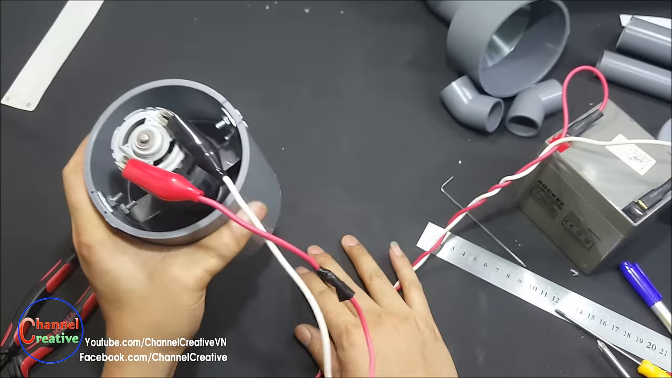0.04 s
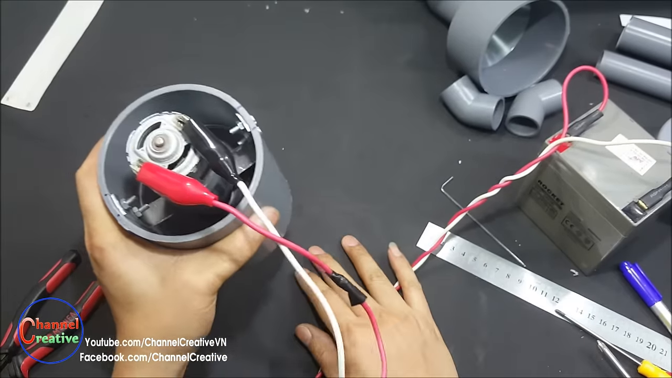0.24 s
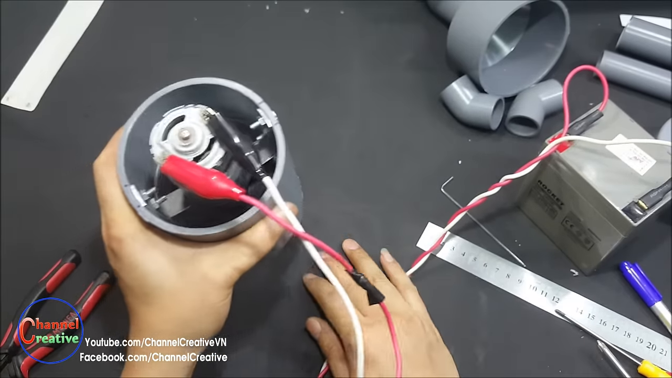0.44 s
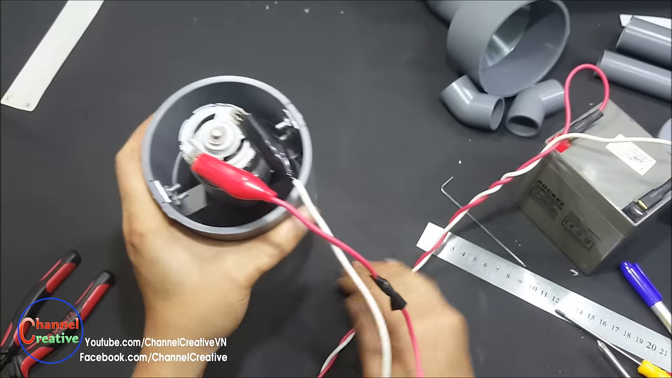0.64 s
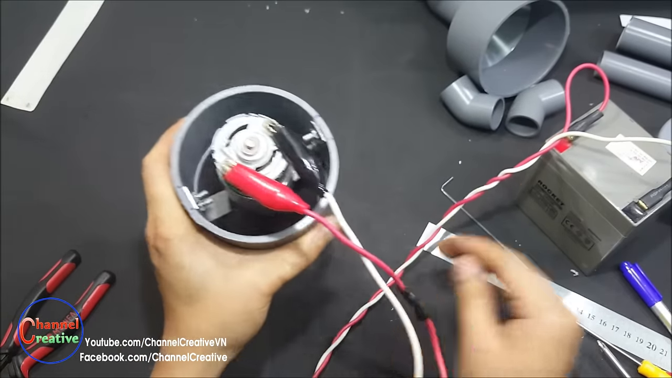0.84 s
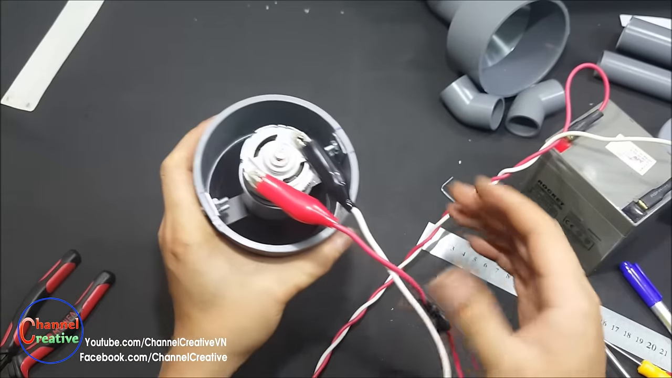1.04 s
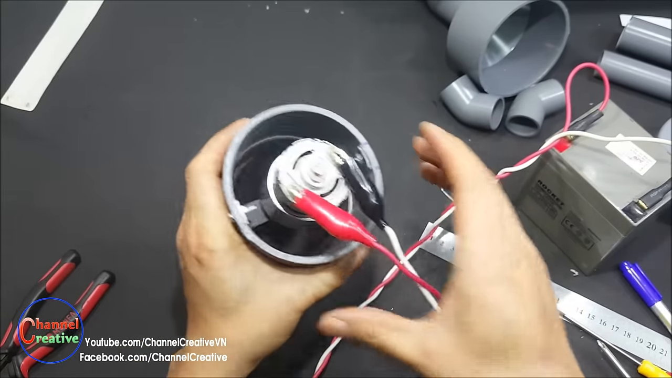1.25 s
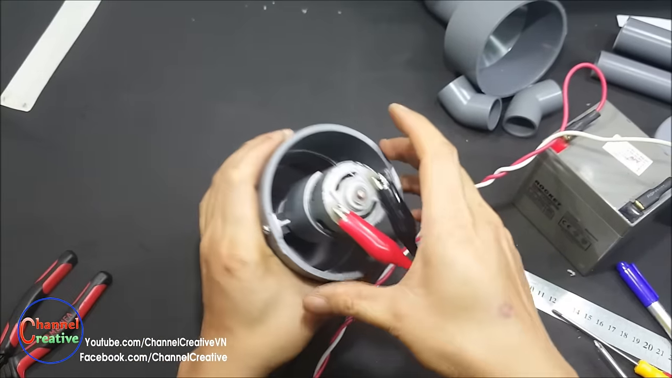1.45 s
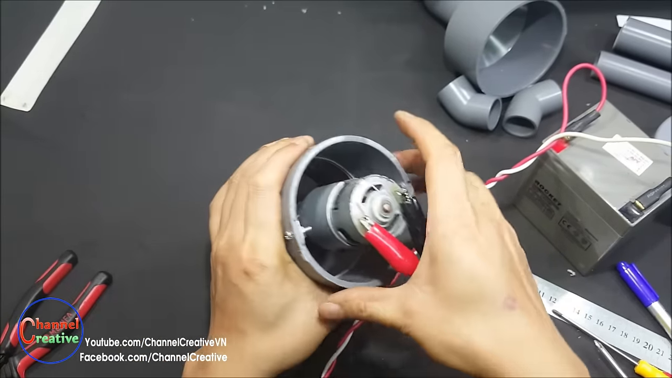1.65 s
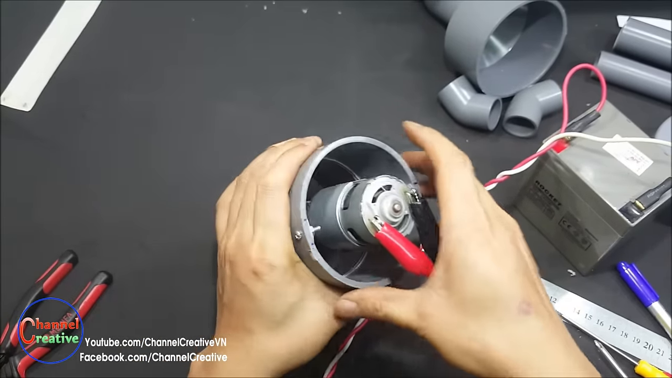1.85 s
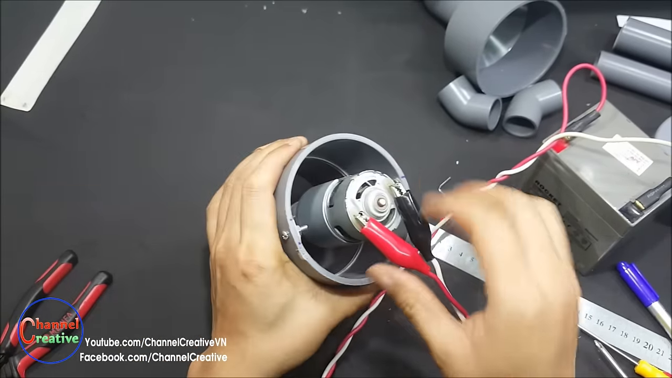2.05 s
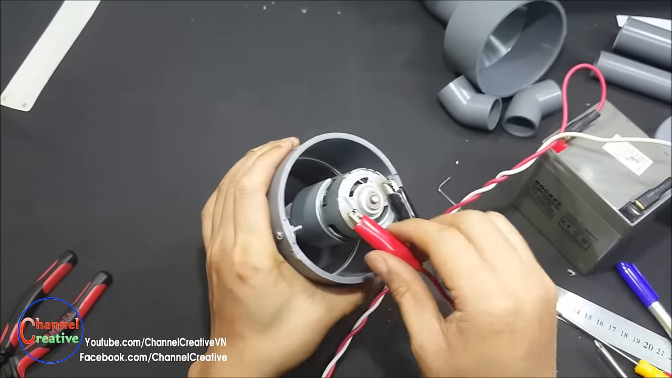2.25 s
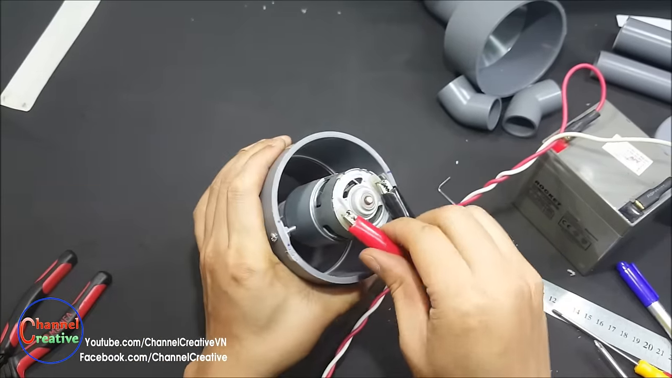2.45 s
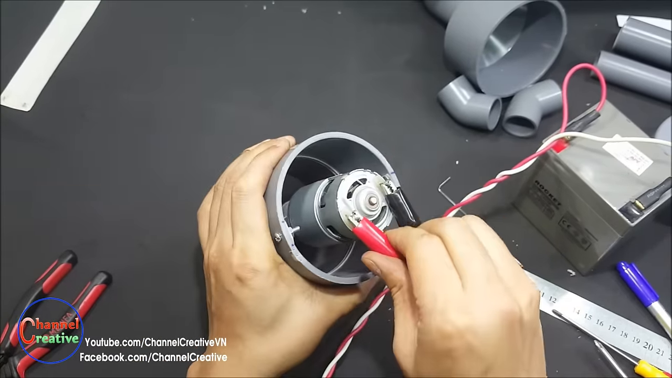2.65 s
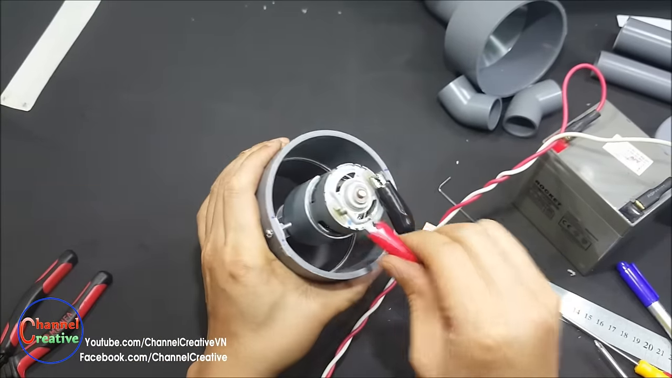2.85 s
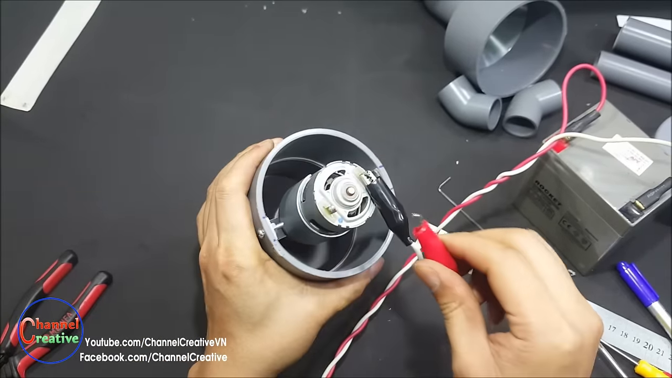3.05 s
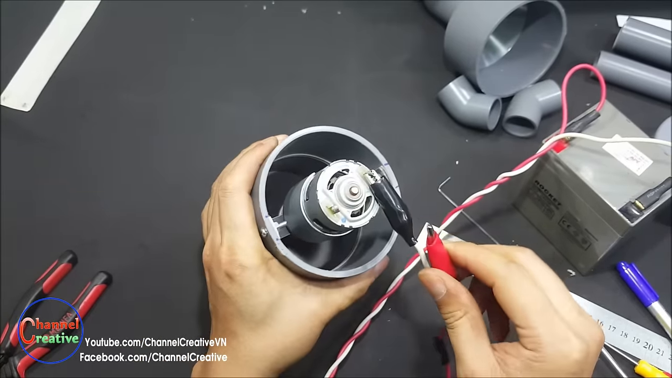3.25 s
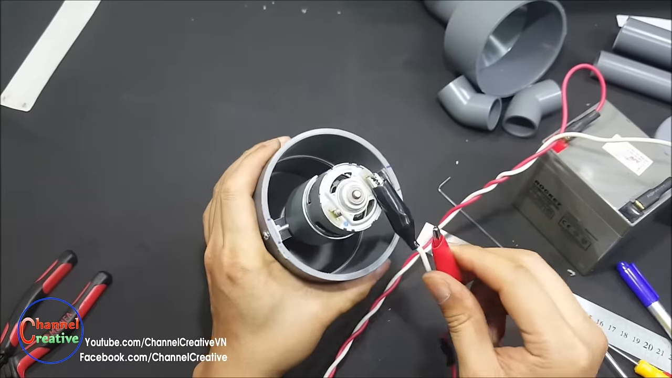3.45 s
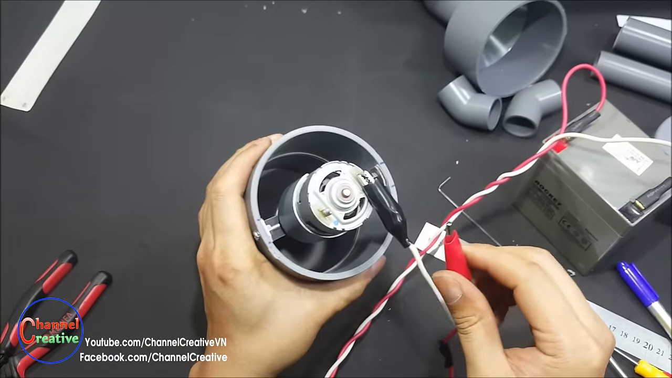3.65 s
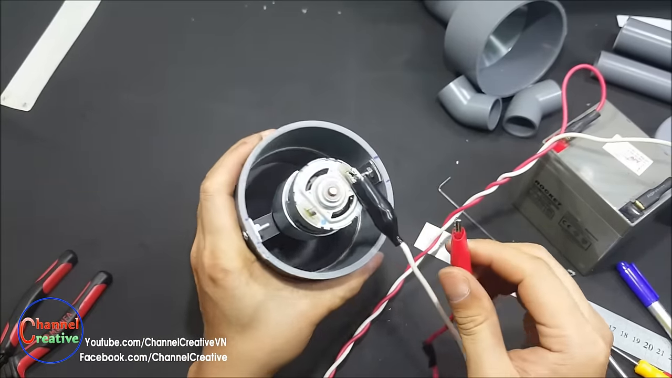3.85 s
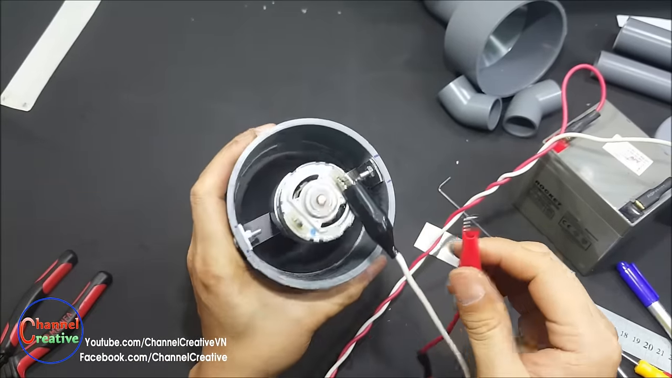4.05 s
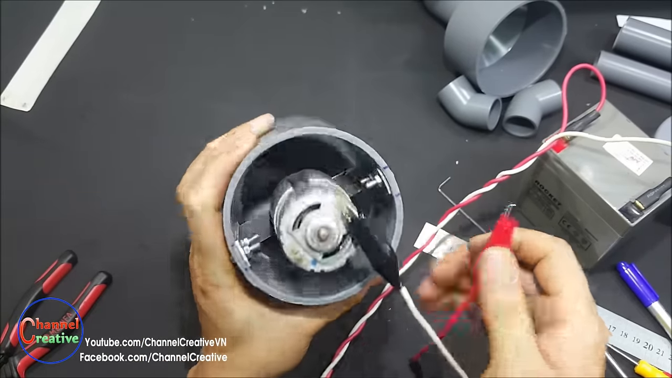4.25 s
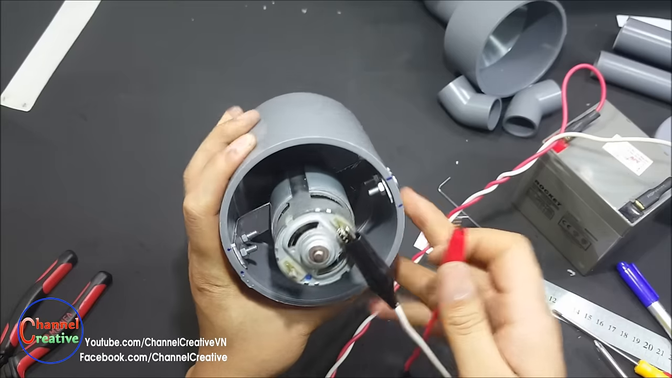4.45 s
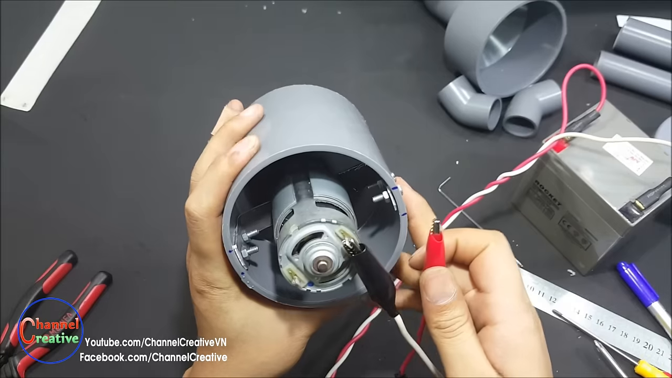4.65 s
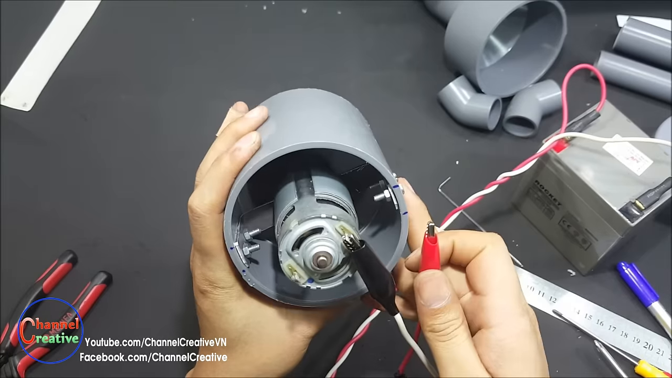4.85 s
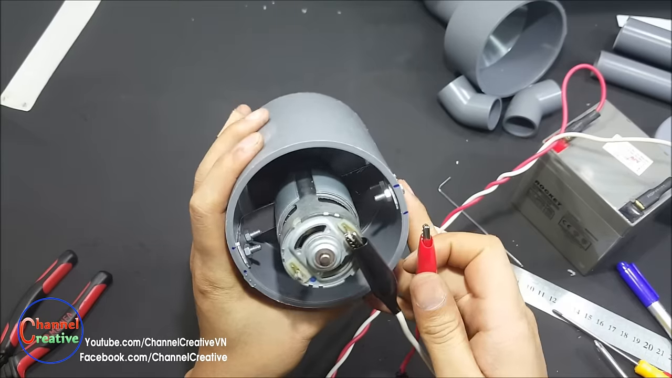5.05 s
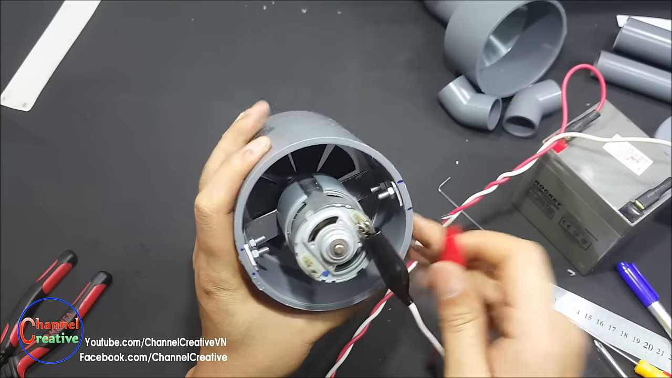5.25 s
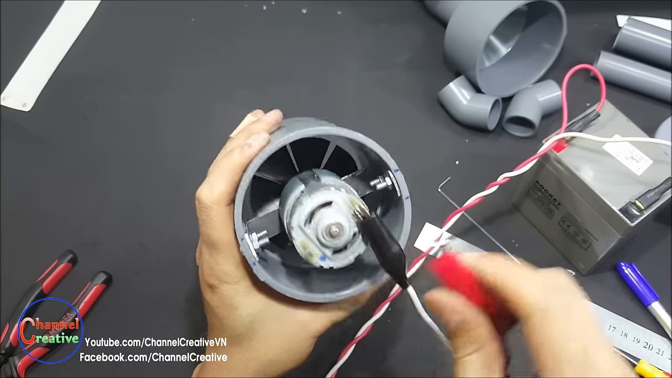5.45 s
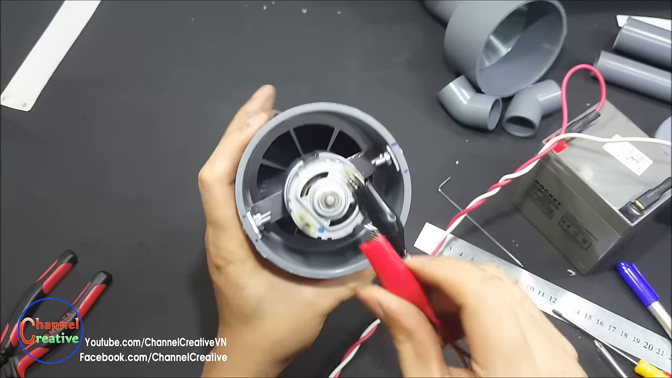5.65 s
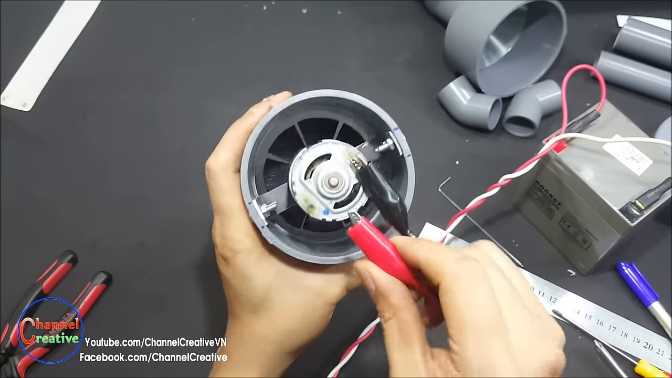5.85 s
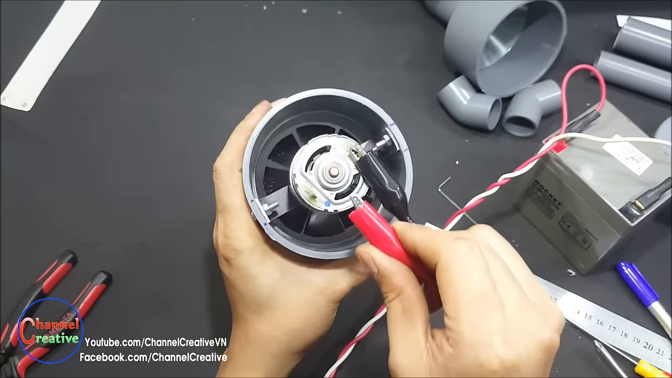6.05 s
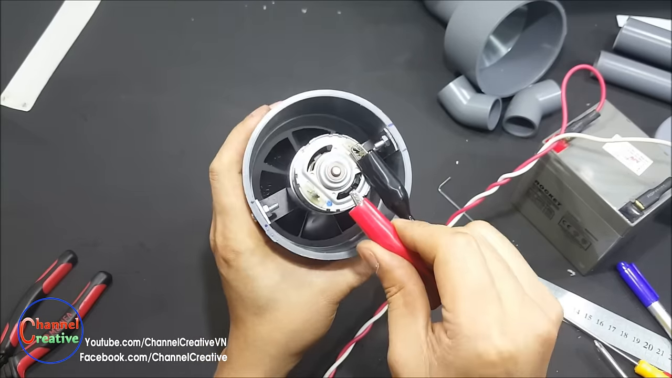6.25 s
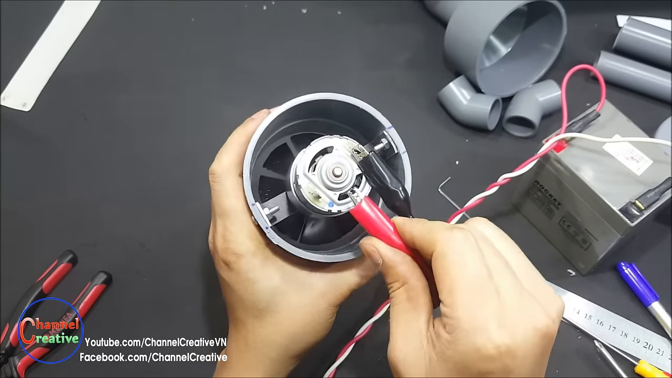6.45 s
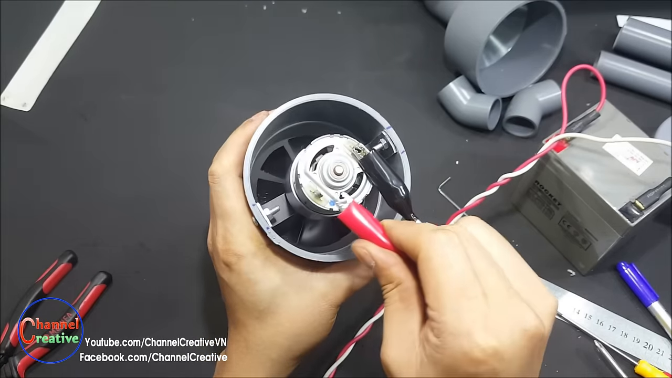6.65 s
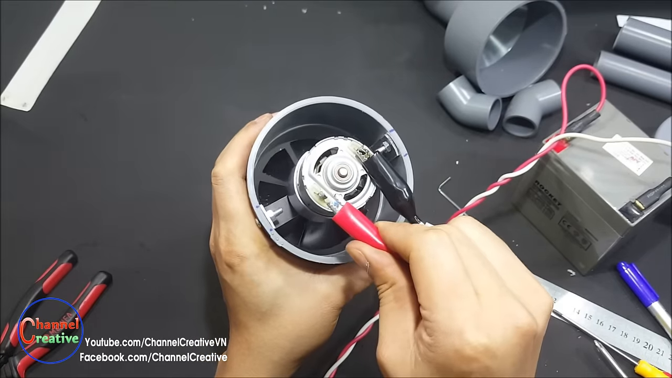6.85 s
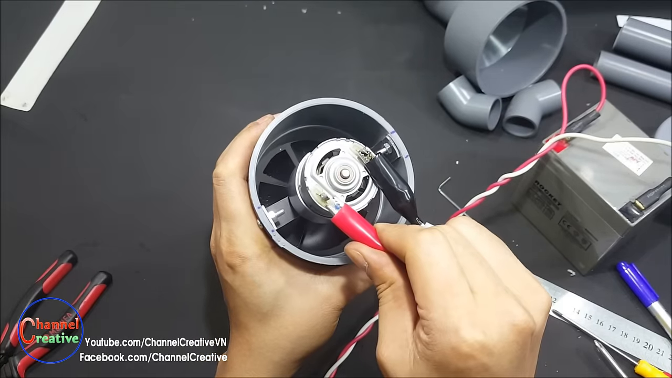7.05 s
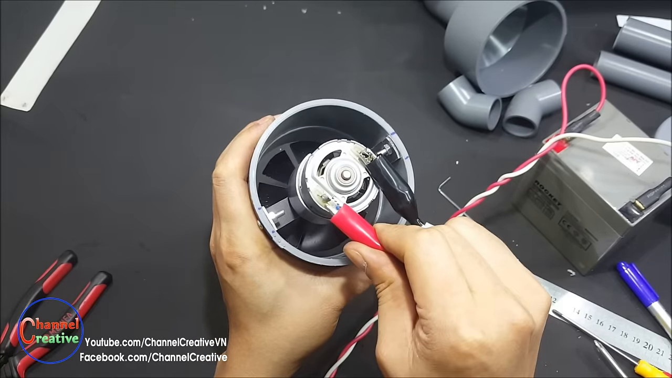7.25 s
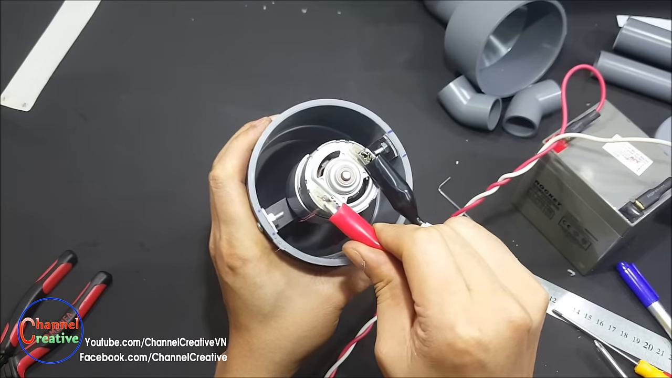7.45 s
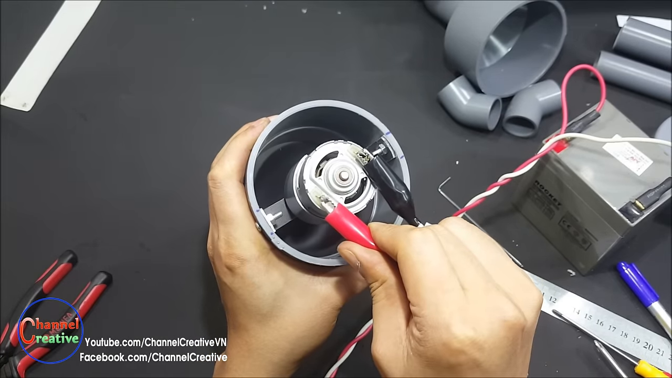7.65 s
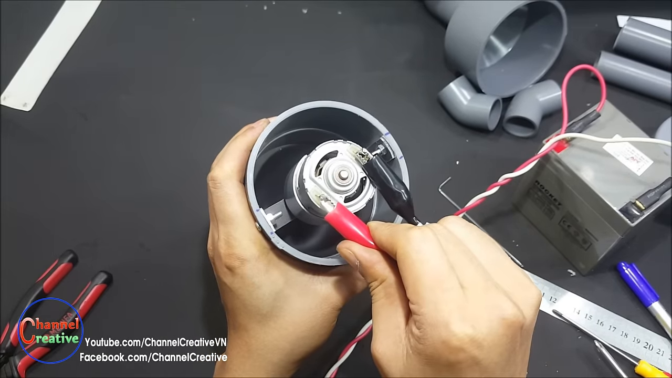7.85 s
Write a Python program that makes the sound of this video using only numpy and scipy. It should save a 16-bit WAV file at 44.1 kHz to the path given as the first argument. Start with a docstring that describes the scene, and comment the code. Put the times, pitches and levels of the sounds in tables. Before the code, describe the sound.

Loud airy fan hiss and motor whine with wind buffeting, then a falling, ringing spin-down into a quiet room drone, ending with sparks and abrupt restart.

```python
"""A small DC motor drives a seven-bladed fan in a short plastic pipe; one shaft speed sets hum, whine and air noise.
Full speed with draught on the microphone, until the supply lead is pulled off and the rotor coasts down,
chattering near its critical speed, singing through the pipe wall, then whirring and scraping.
Behind it a room drones and a distant engine slows. Sparks at the terminal; the motor spins up again.
Noise is shaped by fixed or moving spectra, tones follow shaft turns, sparks ring filtered cracks."""
import sys
import numpy as np
from scipy import signal
from scipy.fft import rfft, irfft, next_fast_len
from scipy.io import wavfile
from scipy.ndimage import uniform_filter1d

SR = 44100
rng = np.random.default_rng(int(sys.argv[2]) if len(sys.argv) > 2 else 0)


def store_pcm(level_fs):
    """Save levels as 16-bit WAV."""
    pcm = np.round(np.clip(level_fs, -1, 1) * 32767).astype(np.int16)
    wavfile.write(sys.argv[1], SR, np.atleast_2d(pcm).T)


N = 348831
TIME = np.arange(N) / SR
FRAMES = np.arange(N // 128 + 2) * 128 / SR  # spectral frame times, s
BINS = np.fft.rfftfreq(1024, 1 / SR)  # Hz

# lead pulled off, rotor at rest, lead put back
CUT_S, REST_S, RESTART_S = 2.853, 5.2, 7.545
# under power: top speed, initial shortfall, settling time, slow sag
TOP_HZ, LACK_HZ, SETTLE_S, SAG_HZ_PER_S = 271.8, 5, .1, .28
DRAG_HZ = 136  # coasting: air drag equals dry friction here
# shaft rattles around critical speed; driven, it gets further before shaking loose
CRITICAL_HZ, CRITICAL_RANGE_HZ, OVERSHOOT_HZ = 163.8, 16.3, 20
# share of speed lost to rattling, growing to full over this range below critical speed
RATTLE_LOSS, RATTLE_RANGE_HZ = .033, 55
IN_STEP_S = 5.05  # drone lines in phase
EDGE_HZ = 15450  # band limit

# spin-up, lingering at critical speed: (time [s], shaft speed [turns/s])
SPIN_UP = [(7.545, 3), (7.58, 76), (7.6, 123), (7.62, 137), (7.645, 146), (7.665, 162), (7.68, 173),
           (7.7, 182), (7.725, 190), (7.745, 204), (7.8, 234), (7.86, 254), (7.91, 260)]
# pipe handling: (time [s], other hand at mouth [0-1], air and brushes toward microphone [dB],
# relative hum [dB], relative whine [dB])
HOLD = [(0, 0.57, 1, -31, -33.5), (.3, 0.48, 0, -22, -28), (.75, 0.37, -2.5, -28, -30.5),
        (1.1, 0.3, -2.5, -47.5, -32), (1.45, 0.75, 2, -41, -29.5), (1.7, 0.95, 1, -31, -28.5),
        (2.2, 0.9, 1, -34.5, -29.5), (2.55, 0.87, 0.5, -39.5, -29), (2.85, 1, 1, -33, -30.5),
        (3.3, 0.7, 0.5, -36, -37.5), (4.2, 0.97, 3.5, -31.5, -41.5), (7.91, 0.6, 1, -24.5, -23.5)]
# mouth direction: (time [s], left over right [dB])
AIM = [(0, 0), (1.7, 0.9), (2.25, 0.5), (2.7, 4.5), (3.2, 0.5), (4.2, 0.5), (7.91, 2)]
# blade turbulence, humped at blade rate and its double: (multiple of shaft speed [-], relative level [dB])
BLADES = [(.45, -45), (.8, -21.5), (2.2, -16), (3.7, -17.5), (4.7, -15.5), (5.5, -13), (6.4, -5),
          (7.2, -5.5), (7.9, -12.5), (8.9, -11), (10.6, -17.5), (12.2, -15.5), (14, -9.5), (17, -19.5),
          (21, -15.5), (40, -25.5)]
# pipe air resonances: (frequency [Hz], width [Hz], lift with mouth free [dB], lift with hand beside it [dB])
PIPE = [(290, 280, -3.5, 2.5), (610, 180, 4, 2), (844, 78, 8.5, 7), (1248, 450, 0, 11), (2436, 630, 5, 7),
        (3050, 230, 14.5, -3.5), (3240, 660, -7.5, 8), (3855, 620, 3, 4), (7800, 3100, 1, 1)]
# main pipe resonance, moved by tilt and shading: (time [s], frequency [Hz], width [Hz], lift [dB])
WHISTLE = [(0, 1864, 190.5, 13.5), (.4, 1810, 199, 8), (.7, 1860, 200, 10.5), (.95, 1890, 220, 7),
           (1.15, 1880, 203, 7), (1.45, 1910, 131.2, 10), (2.1, 1970, 99.6, 5), (2.35, 1900, 110.4, 13),
           (2.8, 1960, 110, 13.5), (3.1, 1850, 99.9, 5), (4.2, 1944, 100, 7.5), (7.8, 1814, 129, 11)]
# left-right likeness of motor sound: (frequency [Hz], correlation [-1 to 1])
MOTOR_LIKENESS = [(200, 0.95), (500, 0.5), (1200, 1), (1900, 0.7), (2700, 0.35), (4000, 0.12), (8000, 0.1),
                  (15000, 0.2)]
# phase lead of left microphone port for motor sound: (frequency [Hz], lead [rad])
MOTOR_LEAD = [(200, .1), (520, 0.34), (1210, 0.744), (1600, 2.17), (1980, 1.14), (2500, 1.16), (3300, 1.2),
              (4000, 2.7), (15000, 1.4)]
# brush hiss spectrum: (frequency [Hz], relative density [dB/Hz])
BRUSHES = [(2000, -15), (4000, -1), (5500, -2), (6800, -7), (8500, 0), (9400, -3), (10000, -14),
           (11800, -7), (15300, -15)]
# shaft chatter spectrum: (frequency [Hz], relative density [dB/Hz])
CHATTER = [(1180, -38), (2000, 4.5), (2390, -10.5), (2650, 0), (3460, -23.5), (4180, -1), (4830, -10),
           (5180, -5), (7420, -10.5), (8510, -8), (15500, -8)]
# bearing rub spectrum: (frequency [Hz], relative density [dB/Hz])
BEARINGS = [(200, -41), (340, -12), (450, -11), (900, -9.5), (1100, -9.5), (2700, -10), (4500, -13.5),
            (8000, -19), (11800, -16), (12800, -30.5), (15000, -23)]
# motor can and pipe modes rung by bearings: (frequency [Hz], width [Hz], lift [dB])
CAN = [(588.4, 150, 11), (781, 150, 5.5), (1348, 200, -3.5), (2130, 109.8, 4), (3480, 180, 7),
       (5327, 210, 5.5), (8670, 990, 8)]
# whine lines: (multiple of shaft speed, rounded in use [-], relative level with mouth free [dB],
# relative level with hand beside it [dB])
WHINE = [(1.987, -11, -5), (3.01, -13, -10.5), (4.99, -18, -2), (6, -11.5, 4), (8, -13, -4.5),
         (12, -11.5, -8.5), (15, -12, -3.5), (30, -13, -16), (38.07, -19.5, -18.5), (38.86, -23.5, -23),
         (50, -19, -19)]
# draught on microphone until pipe is turned aside: (time [s], relative level [dB])
DRAUGHT = [(0, -27), (.2, -32.5), (.7, -28.5), (1.0, -27.5), (1.3, -28), (1.6, -36), (1.9, -31), (2.2, -55),
           (2.7, -67.5)]
# bursts of low noise, dull puff to full roar: (time [s], level [dB], spread [s], roar [0-1])
BURSTS = [(.028, -19, 0.012, 0.4), (.092, -19.5, 0.022, 0.5), (.22, -30, .012, 1),
          (.32, -27.5, 0.028, 0.94), (.44, -24.5, 0.024, 0.74), (.51, -22.5, 0.0092, 0.94),
          (0.568, -20.5, 0.0077, 1), (.635, -19.5, 0.0055, 0.87), (.7, -21.5, .011, 0.9),
          (.762, -20, 0.011, 0.4), (.85, -27.5, 0.018, 0.6), (.91, -29, 0.018, 0.5), (.955, -21, .03, 0.61),
          (1.035, -28.5, 0.011, 0.4), (1.095, -24, .013, .3), (1.135, -22, .012, 0.46),
          (1.24, -19, 0.015, 0.46), (1.278, -25.5, .012, 0.9), (1.32, -21, .012, 0.25),
          (1.45, -22.5, 0.025, 0.66), (1.52, -31.5, .02, 0.1), (1.655, -30.5, .012, 0.36),
          (1.74, -39.5, .014, 0.3), (1.85, -36, .012, 0), (1.94, -31, .012, 0.1), (2.01, -33, 0.013, 0.2),
          (2.06, -34, 0.018, 0.17), (2.2, -39.5, .014, 0), (2.29, -42.5, .014, 0.3), (2.4, -37, .012, 0.04),
          (2.6, -40, .012, 0.05), (2.76, -39, .014, 0), (3.0, -37.5, .04, 0), (3.15, -27, .018, 0.7),
          (3.2, -36, .01, 0), (3.45, -34.5, 0.021, 0.15), (3.55, -39, .025, 0), (3.67, -34.5, 0.032, 0.12),
          (3.75, -38, 0.018, 0), (3.819, -31, 0.012, 0.57), (3.88, -39, 0.058, 0), (4.26, -41, 0.038, 0),
          (4.46, -38.5, 0.018, 0), (7.868, -13, 0.02, 0.5)]
# roar spectrum: (frequency [Hz], relative density [dB/Hz])
WIND = [(25, -31.5), (60, -5.5), (120, -7.5), (300, 3.5), (500, -1.5), (800, -5.5), (1300, -8.5),
        (3000, -35)]
# dull puff spectrum: (frequency [Hz], relative density [dB/Hz])
PUFF = [(25, -28), (70, -2.5), (160, 5), (300, -22), (700, -58)]
# room drone, two lowest lines beat: (frequency [Hz], relative level [dB])
DRONE = [(99.87, -57.5), (102.4, -49), (203, -65), (301.3, -66), (781, -66.5)]
# distant engine: (time [s], firing rate [1/s], relative level [dB])
ENGINE = [(3.9, 42.42, -68), (4.5, 41.1, -58.5), (4.9, 39.9, -62), (5.4, 37.04, -54.5), (6.2, 36.28, -55),
          (6.8, 35.46, -54), (7.1, 34.7, -55), (7.5, 33.6, -53.5)]
# engine lines: (multiple of firing rate [-], relative level [dB])
ENGINE_LINES = [(2, 2.5), (4, 1.5), (5, -2.5), (7, -12)]
# room wash spectrum: (frequency [Hz], relative density [dB/Hz])
ROOM = [(15, -56.5), (25, -20), (37, -34.5), (59, -10), (104, -10.5), (188, -12), (227, -21.5), (305, -22),
        (410, -25), (482, -25), (722, -30.5), (782, -32), (871, -29), (14300, -57.5), (15500, -61)]
# left-right likeness of room wash: (frequency [Hz], correlation [-1 to 1])
ROOM_LIKENESS = [(170, 0.9), (800, 0.13), (1050, -0.32), (1500, -0.12), (2500, -0.0036), (15000, -0.2)]
# push of shaking rotor on pipe: (multiple of shaft speed [-], relative level [dB],
# fall below peak speed [dB/octave], slowest shaft speed [Hz], fastest shaft speed [Hz])
SHAKING = [(1, -0.5, 25, 177, 240), (2, -1, 15, 156, 198), (3, -1, 37, 134, 280), (4, -11.5, 10, 135, 235),
           (5, -4, 22, 145, 290), (6, -7.5, 36, 139, 235), (7, -11, 29, 130, 260), (8, -11, 17.5, 140, 235),
           (10, -4.5, 27, 142.6, 200), (12, -4.5, 37, 130, 170), (13, -10, 29, 140, 235),
           (14, -7.5, 28, 150, 235)]
# pipe wall modes: (frequency [Hz], width [Hz], relative level [dB])
WALL = [(189, 20, -7.5), (228, 42, -3), (320.4, 17, -0.5), (380.6, 24, 0.5), (437.5, 14, 9),
        (558.5, 9, 7.5), (621, 37, 1), (700, 62, 1), (830, 49, -3), (1320, 90, -3.5), (1629, 36, 8.5),
        (2034, 55, 8.5)]
# brief tones at single pitches: ringing modes, shaft multiples, blade tone of the spin-up:
# (time [s], frequency [Hz], level [dB], spread [s])
BRIEF_TONES = [(3.04, 910, -26.5, 0.014), (3.122, 1282, -19.5, 0.017), (3.18, 1298, -16, 0.0088),
               (3.45, 580, -32.5, 0.045), (3.47, 1997, -24, 0.02), (3.88, 1315, -39.5, .03),
               (3.88, 1990, -47, .03), (3.97, 644, -40, 0.027), (4.46, 1110, -58, 0.032),
               (4.92, 2120, -65.5, 0.059), (7.62, 1929, -28, 0.0064), (7.684, 2060, -19.5, 0.011),
               (7.825, 1810, -27, .017), (7.879, 1842, -14, 0.016)]
# scrapes of dying rotor: (time [s], level [dB], spread [s], rasp [0-1])
SCRAPES = [(3.811, -26.5, 0.0032, 0.03), (4.44, -41, .006, 0.3), (4.487, -51, 0.0061, .1),
           (4.515, -43, 0.0049, 0.2), (4.543, -43, .004, 0.3), (4.565, -39.5, 0.0045, 0.5),
           (4.59, -46, 0.011, 0.85), (4.615, -42, 0.0046, 0.2), (4.775, -60, .005, .1),
           (4.797, -54, .004, .2), (4.83, -54, .005, .1), (4.852, -54, .004, .1), (4.872, -56, 0.0046, .15)]
# lead sparks or ticks on terminal: (time [s], relative level [dB], decay [s], brightness [0-1])
SPARKS = [(5.35, -69, .03, 0.6), (5.67, -70, 0.041, 0.66), (5.976, -64, 0.043, 0.6),
          (7.5425, -24.5, 0.0055, 0.35), (7.568, -37, .005, .2), (7.604, -23.5, 0.014, 0.5)]
# terminal modes: (frequency [Hz], width [Hz], relative level [dB])
TERMINAL = [(866, 180, 1), (1700, 380, 0), (2510, 800, -3), (4200, 1100, -13), (8700, 4000, -21)]


def amp(db):
    """Decibels to linear gain."""
    return 10 ** (np.asarray(db) / 20)


def evened(x):
    """Scale to unit power."""
    return x / np.sqrt(np.mean(x ** 2) + 1e-20)


def read(points, hz):
    """Table value, linear over log frequency."""
    f, value = np.transpose(points)
    return np.interp(np.log(hz + 1e-6), np.log(f), value)


def follow(rows, t, axis=1):
    """One column of a time curve at times t."""
    rows = np.array(rows)
    return np.interp(t, rows[:, 0], rows[:, axis])


def wander(rate_hz):
    """Slow random signal of unit power."""
    hz = np.arange(N // 2 + 1) * SR / N
    spectrum = rfft(rng.standard_normal(N)) / (1 + (hz / rate_hz) ** 4)
    return evened(irfft(spectrum, next_fast_len(N))[:N])


def noise(shape_db, likeness, lead_rad=0):
    """Unit-power stereo noise, fixed or moving spectrum; left may lead in phase."""
    a, b, c, d = rng.standard_normal((4, len(FRAMES), len(BINS)), dtype=np.float32)
    same = read(likeness, BINS)
    left = a + 1j * b
    right = same * np.exp(-1j * lead_rad) * left + np.sqrt(1 - same ** 2) * (c + 1j * d)
    shape = amp(shape_db)
    shape = shape / np.linalg.norm(shape, axis=-1, keepdims=True)
    z = (np.array([left, right]) * shape).astype(np.complex64)
    _, x = signal.istft(z, nperseg=1024, noverlap=896, time_axis=1, freq_axis=2)
    return evened(x[:, :N])


def tone(turns, waver, rate_hz, apart_rad):
    """Unit-power line; strength and phase waver, partly independently per ear."""
    steps = np.arange(int(9 * rate_hz) + 2) / rate_hz
    a, b, c, d = rng.standard_normal((len(steps), 4)).T * waver
    angle = (2 * np.pi * (turns % 1)).astype(np.float32)
    ears = []
    for side in (1, -1):
        phase = angle + side * apart_rad / 2
        in_phase = np.interp(TIME, steps, 1 + a + side * b / 2)
        quadrature = np.interp(TIME, steps, c + side * d / 2)
        ears.append(in_phase * np.cos(phase) + quadrature * np.sin(phase))
    return evened(np.array(ears))


def lean(db):
    """Left-right gains, left louder by db."""
    return amp(db * np.array([[.5], [-.5]]))


def bump(s, spread_s):
    """Gaussian rise and fall around time s."""
    return np.exp(-np.minimum(((TIME - s) / spread_s) ** 2 / 2, 40))


def lifts(modes, at_hz):
    """Summed resonance gain in dB at given frequencies."""
    return sum(db / (1 + (2 * (at_hz - hz) / width) ** 2) for hz, width, db in modes)


def resonator(modes, hz):
    """Summed complex response of damped modes."""
    return sum(amp(db) / (1 + 2j * (hz - f) / width) for f, width, db in modes)


def shaft(t):
    """Turns/s: powered with slow sag, braked by air drag and dry friction after the cut, then driven up."""
    running = TOP_HZ - LACK_HZ * np.exp(-t / SETTLE_S) - SAG_HZ_PER_S * t
    left = np.clip((REST_S - t) / (REST_S - CUT_S), 0, 1)
    coasting = DRAG_HZ * np.tan(np.arctan(running / DRAG_HZ) * left)
    coasting = coasting * (1 - RATTLE_LOSS * np.clip((CRITICAL_HZ - coasting) / RATTLE_RANGE_HZ, 0, 1))
    return np.where(t < RESTART_S, np.maximum(coasting, 1), follow(SPIN_UP, t))  # 1 Hz floor for the logs


def octaves(speed):
    """Octaves from top speed, negative when slower."""
    return np.log2(speed / TOP_HZ)


def surge():
    """Starting strain: near 1 at restart, 0 from critical speed."""
    return (TIME > RESTART_S) * np.maximum(1 - shaft(TIME) / CRITICAL_HZ, 0) ** 2


def pipe(drift=0.0061):
    """Pipe gain in dB per frame as the hand comes and goes; resonances drift slightly."""
    near = follow(HOLD, FRAMES)[:, None]
    at_hz = BINS * (1 + drift * np.interp(FRAMES, TIME, wander(rate_hz=9.9)))[:, None]
    free_db = lifts([(hz, width, free) for hz, width, free, _ in PIPE], BINS)
    shaded_db = lifts([(hz, width, shaded) for hz, width, _, shaded in PIPE], BINS)
    free = np.interp(at_hz, BINS, free_db)
    shaded = np.interp(at_hz, BINS, shaded_db)
    whistle = [follow(WHISTLE, FRAMES, axis=k)[:, None] for k in (1, 2, 3)]
    return (1 - near) * free + near * shaded + lifts([whistle], at_hz)


def motor_noise(shape_db):
    """Motor noise as the two microphone ports hear it."""
    return noise(shape_db, MOTOR_LIKENESS, read(MOTOR_LEAD, BINS))


def rush(speed, top_db=-15.0, fast_db_per_octave=7, slow_db_per_octave=23, knee_hz=160):
    """Thrown-air level: steep with speed, gentler above a knee."""
    below = np.log2(1 + (knee_hz / speed) ** 8) / 8
    return top_db + fast_db_per_octave * octaves(speed) - (slow_db_per_octave - fast_db_per_octave) * below


def fan(speed, turns, flutter_db=1, chop=0.028, surge_db=14, tonal_db=-7, tonal_hz=205):
    """Blade turbulence slides with shaft speed through the pipe resonances."""
    air = motor_noise(read(BLADES, BINS / shaft(FRAMES)[:, None]) + pipe())
    # slower air is less turbulent: rough lines stand out of the hump
    lines = sum(amp(read(BLADES, k)) * tone(k * turns, waver=1.0, rate_hz=30, apart_rad=.3)
                for k in range(4, 10))
    air = air + amp(tonal_db) * lines / (1 + (speed / tonal_hz) ** 10)
    pulsing = 1 + chop * np.cos(2 * np.pi * turns)
    level_db = rush(speed) + follow(HOLD, TIME, axis=2) + surge_db * surge()
    level_db = level_db + flutter_db * wander(rate_hz=28)
    return air * pulsing * amp(level_db) * lean(follow(AIM, TIME))


def friction(speed, turns, brush_db=-23, brush_db_per_octave=12, chatter_db=-17, chatter_db_per_octave=20,
             bearing_db=-27.0, grind_db=8, bearing_db_per_octave=8, slow_hz=105, scrape=0.14, grit_db=0.5):
    """Brushes hiss at speed, shaft chatters near critical speed, slow gritty bearings rub once a turn."""
    critical_hz = CRITICAL_HZ + OVERSHOOT_HZ * (TIME > RESTART_S)
    loose = np.exp(-((speed - critical_hz) / CRITICAL_RANGE_HZ) ** 4)
    slow = 1 / (1 + (speed / slow_hz) ** 4)

    brush_level_db = brush_db + brush_db_per_octave * octaves(speed) + follow(HOLD, TIME, axis=2)
    brush_gain = amp(brush_level_db) * np.sqrt((1 - loose) * (1 - slow))
    brushes = brush_gain * motor_noise(read(BRUSHES, BINS) + pipe())

    chatter_level_db = chatter_db + chatter_db_per_octave * np.log2(speed / critical_hz)
    chatter = amp(chatter_level_db) * np.sqrt(loose) * motor_noise(read(CHATTER, BINS))

    # slower bearings: duller, more can ringing
    can_db = lifts(CAN, BINS)
    dull_db = 0.49 * can_db - 5.4 * np.log2(1 + BINS / 3000)
    dull_db = dull_db / (1 + (shaft(FRAMES)[:, None] / 28) ** 4)
    bearing_gain = amp(bearing_db + bearing_db_per_octave * octaves(speed)) * np.sqrt(slow)
    bearings = bearing_gain * motor_noise(read(BEARINGS, BINS) + can_db + dull_db)
    rough_db = 1.1 * wander(rate_hz=23) + grit_db * wander(rate_hz=220) + grind_db * surge()
    rub = (1 + scrape * np.cos(2 * np.pi * turns)) * amp(rough_db)
    creak = amp(5 / (1 + (speed / 28) ** 4))  # extra level when slowest
    return (brushes + chatter + bearings * rub * creak) * amp(.5 * wander(rate_hz=24)) * lean(db=1.45)


def rotor(speed, turns, hum_db=2, hum_db_per_octave=22, whine_db_per_octave=34, waver=0.31,
          waver_per_multiple=.025):
    """Unbalance hums once a turn; commutator and blades whine on multiples, low ones steadiest."""
    hum_level_db = follow(HOLD, TIME, axis=3) + hum_db + hum_db_per_octave * octaves(speed)
    hum = amp(hum_level_db) * tone(turns, waver=0.35, rate_hz=13, apart_rad=1.75)
    near = follow(HOLD, TIME)
    whine = 0
    for k, free_db, shaded_db in WHINE:
        line = tone(round(k) * turns, waver + waver_per_multiple * k, rate_hz=12, apart_rad=1.5)
        whine = whine + amp(free_db + near * (shaded_db - free_db)) * line
    whine_level_db = follow(HOLD, TIME, axis=4) + whine_db_per_octave * octaves(speed)
    return hum + amp(whine_level_db) * whine * lean(db=-1.5)


def draught(lump_db=2.5, level_db=3):
    """Lumpy wind, unrelated at the two microphone ports; fades to mostly stray soft bursts of bass."""
    lumps = amp(lump_db * np.array([wander(rate_hz=21), wander(rate_hz=23)]))
    unrelated = [(1, 0), (2, 0)]
    roars = amp(follow(DRAUGHT, TIME) + level_db) * evened(lumps)
    puffs = 0
    for s, db, spread_s, roar in BURSTS:
        burst = amp(db) * bump(s, spread_s)
        roars = roars + roar * burst
        puffs = puffs + (1 - roar) * burst
    return noise(read(WIND, BINS), unrelated) * roars + noise(read(PUFF, BINS), unrelated) * puffs


def room(wash_db=-49, wash_rise=0.49):
    """Machines drone and beat; a distant engine slows and grows louder; low wash rises as the motor dies down."""
    drone = sum(amp(db) * tone(hz * (TIME - IN_STEP_S), waver=0.15, rate_hz=4.1, apart_rad=.2)
                for hz, db in DRONE)
    firings = np.cumsum(follow(ENGINE, TIME)) / SR
    engine_db = follow(ENGINE, TIME, axis=2)
    lines = sum(amp(db) * tone(k * firings, waver=0.28, rate_hz=3.6, apart_rad=0.22) for k, db in ENGINE_LINES)
    # the engine's level curve, scaled, also shapes the wash
    wash_level_db = wash_db + wash_rise * (engine_db - engine_db.max())
    wash = amp(wash_level_db) * noise(read(ROOM, BINS), ROOM_LIKENESS)
    return (drone + amp(engine_db) * lines + wash) * lean(db=1.6)


def singing(speed, turns, level_db=-23, peak_hz=176, above_db_per_octave=30, between_db=-27, wobble_turns=.007,
            driven_db=-4):
    """Rotor shakes hardest near peak_hz, less when driven; its multiples ring wall modes as they sweep across."""
    away = np.log2(speed / peak_hz)
    turns = turns + wobble_turns * wander(rate_hz=70)  # uneven turning roughens high multiples
    push = 0
    for k, db, fall, slowest, fastest in SHAKING:
        stirred = 1 / (1 + (slowest / speed) ** 48 + (speed / fastest) ** 48)
        line = tone(k * turns, waver=.42, rate_hz=40, apart_rad=.5)
        push = push + amp(db + fall * np.minimum(away, 0)) * stirred * line
    push = push * amp(level_db - above_db_per_octave * np.maximum(away, 0) + driven_db * (TIME > RESTART_S))
    size = next_fast_len(N + SR // 4)  # space for the ring-out
    wall = amp(between_db) + resonator(WALL, np.fft.rfftfreq(size, 1 / SR))
    return irfft(rfft(push, size) * wall, size)[:, :N]


def brief_tones():
    """Brief, slightly rough tones at single pitches: ringing modes, shaft multiples, blade tone of the spin-up."""
    out = np.zeros((2, N))
    t = np.arange(SR // 2) / SR - .25
    grit = wander(rate_hz=55)[:len(t)]
    for s, hz, db, spread_s in BRIEF_TONES:
        lead_rad = read(MOTOR_LEAD, hz) * np.array([[.5], [-.5]])
        pitch = np.sqrt(2) * np.cos(2 * np.pi * hz * t + 0.35 * grit + lead_rad)
        swell = np.exp(-np.minimum((t / spread_s) ** 2 / 2, 40))
        part = out[:, round((s + t[0]) * SR):][:, :len(t)]
        part += (amp(db) * pitch * swell)[:, :part.shape[1]]
    return out


def whirr(speed, turns, level_db=-39, db_per_octave=18, mode_hz=595, width_hz=200, below_hz=104):
    """Well below critical speed, successive multiples glide down through a low can mode."""
    lines = 0
    for k in range(5, 13):
        resonance = 1 / (1 + (2 * (k * speed - mode_hz) / width_hz) ** 2)
        lines = lines + tone(k * turns, waver=0.58, rate_hz=30, apart_rad=0.66) * resonance
    slow = (TIME < REST_S) / (1 + (speed / below_hz) ** 10)
    return amp(level_db + db_per_octave * np.log2(speed / below_hz)) * slow * lines


def scrapes(ring_hz=680, ring_width_hz=340):
    """Each catch of the dying rotor rings low can modes; some also rasp."""
    can_db = lifts(CAN, BINS)
    low = motor_noise(can_db - 20 * np.log10(1 + ((BINS - ring_hz) / ring_width_hz) ** 4))
    rasp = motor_noise(read(BEARINGS, BINS) + can_db)
    dull = sum(amp(db) * (1 - sharp) * bump(s, spread_s) for s, db, spread_s, sharp in SCRAPES)
    harsh = sum(amp(db) * sharp * bump(s, spread_s) for s, db, spread_s, sharp in SCRAPES)
    return low * dull + rasp * harsh


def sparks(ring=0.29, ring_s=0.029):
    """Each touch is a crack that rings the terminal and dies away in the pipe."""
    out = np.zeros((2, N))
    t = np.arange(SR // 4) / SR
    body = resonator(TERMINAL, np.fft.rfftfreq(len(t), 1 / SR))
    for s, db, decay_s, bright in SPARKS:
        crack = rng.standard_normal((2, len(t)))
        rung = evened(irfft(rfft(crack) * body, len(t)))
        hiss = evened(np.diff(crack, prepend=0))
        colour = evened((1 - bright) * rung + bright * hiss)
        fade = np.exp(-t / decay_s) + ring * np.exp(-t / ring_s)
        part = out[:, round(s * SR):][:, :len(t)]
        part += (amp(db) * colour * fade)[:, :part.shape[1]]
    return out


def straining(speed, turns, level_db=-23, double_db=-13, db_per_octave=-2, onset_hz=92, howl_db=-24,
              howl_hz=183, howl_range_hz=18):
    """Spinning up, the blade rate rises as a rough whine; shaken loose, the rotor howls on its third multiple."""
    driven = TIME > RESTART_S
    blades = tone(7 * turns, waver=.9, rate_hz=170, apart_rad=.3)
    blades = blades + amp(double_db) * tone(14 * turns, waver=2, rate_hz=300, apart_rad=1)
    lag = np.maximum(1 - speed / TOP_HZ, 0)
    onset = 1 / (1 + (onset_hz / speed) ** 6)
    whine = amp(level_db + db_per_octave * np.log2(speed / CRITICAL_HZ)) * driven * lag * onset
    loose = driven * np.exp(-np.minimum(((speed - howl_hz) / howl_range_hz) ** 6, 40))
    howl = tone(3 * turns, waver=.2, rate_hz=50, apart_rad=.5)
    return whine * blades + amp(howl_db) * loose * howl


def scene():
    """One shaft speed drives the motor sounds; draught, room, brief tones, scrapes and sparks join them."""
    speed = shaft(TIME)
    turns = np.cumsum(speed) / SR
    motor = sum(source(speed, turns) for source in (fan, friction, rotor, singing, whirr, straining))
    return motor + draught() + room() + brief_tones() + scrapes() + sparks()


def record(dry, bass_hz=165, threshold_db=-57, slope=0.49, open_db=-43.0):
    """Suppressor lowers weak bass as the rest grows loud, strong bass opens it; then the band limit."""
    bass = signal.sosfiltfilt(signal.butter(7, bass_hz, fs=SR, output="sos"), dry)
    loud_db, bass_db = (10 * np.log10(uniform_filter1d((v ** 2).mean(0), size=1800).clip(1e-14))
                        for v in (dry - bass, bass))
    shut = 1 / (1 + amp(bass_db - open_db) ** 5)
    bass_gain = amp(-slope * shut * np.maximum(loud_db - threshold_db, 0))
    out = dry - bass * (1 - bass_gain)
    band = signal.firwin(601, EDGE_HZ, window=("kaiser", 8), fs=SR)
    return signal.oaconvolve(out, band[None], "same")


dry = scene()
out = record(dry)
store_pcm(out)
```